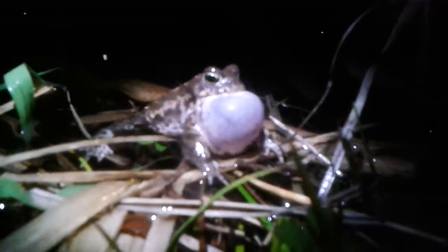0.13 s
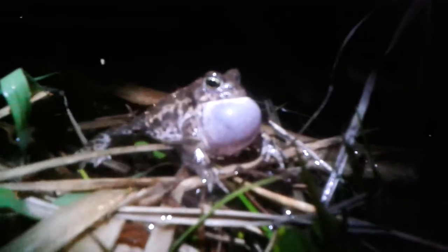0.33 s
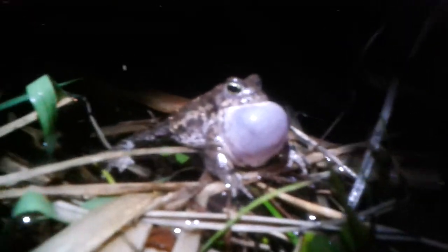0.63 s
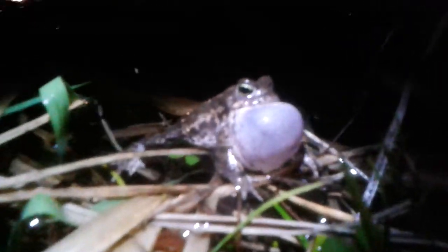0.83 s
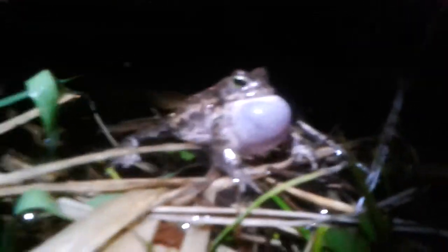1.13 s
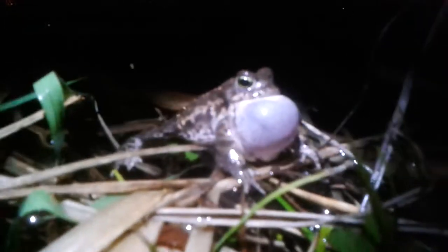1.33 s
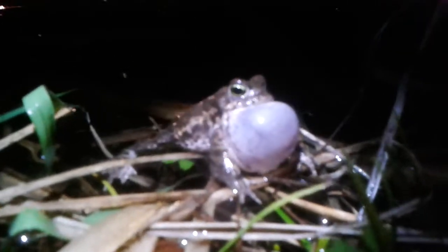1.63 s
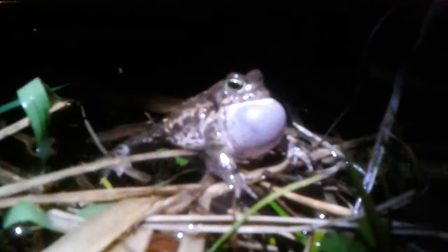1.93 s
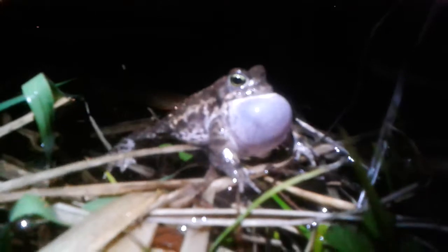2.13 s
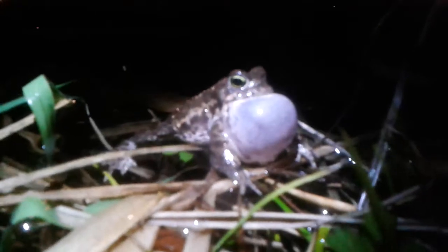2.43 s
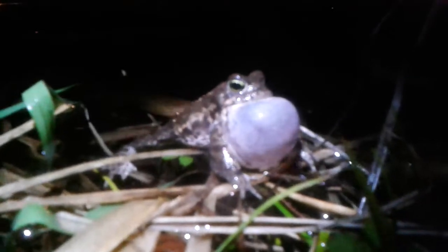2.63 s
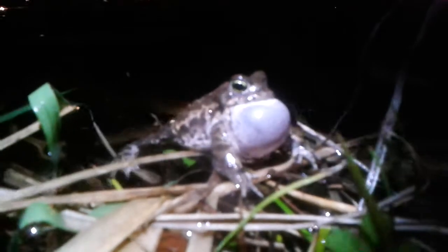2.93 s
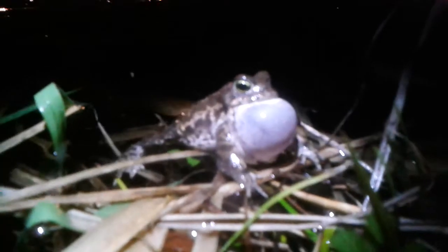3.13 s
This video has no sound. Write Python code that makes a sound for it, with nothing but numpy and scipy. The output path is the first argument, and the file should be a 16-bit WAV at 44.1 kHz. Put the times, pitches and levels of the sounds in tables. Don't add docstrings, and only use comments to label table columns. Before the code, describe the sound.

A toad very close by gives loud, harsh rattling trills over a throbbing distant toad chorus.

```python
import sys
import numpy as np
from scipy import signal
from scipy.io import wavfile
from scipy.ndimage import uniform_filter1d

SR = 44100
rng = np.random.default_rng(int(sys.argv[2]) if len(sys.argv) > 2 else 0)


def master_out(mix):
    frames = np.transpose(np.atleast_2d(mix))
    ceiling = np.clip(frames, -1, 1)
    pcm = np.round(ceiling * 32767).astype(np.int16)
    wavfile.write(sys.argv[1], SR, pcm)


def how_loud(loudness_db):
    steps = np.asarray(loudness_db, float) / 20
    return 10 ** steps


N = 144648


def rings(start_s, level_db, pitch_hz, attack_s, decay_db_per_s, dip_hz=0., octave_db=-57.0):
    chirp_hz, chirp_s, dip_s = 520, 0.0006, 0.004

    def column(value):
        return np.broadcast_to(value, np.shape(start_s))[:, None]

    first = (np.asarray(start_s) * SR).astype(int)
    offsets = np.arange(int(.04 * SR))
    since = np.maximum(offsets / SR - (column(start_s) - first[:, None] / SR), 0)
    cycles = column(pitch_hz) * since
    cycles = cycles - column(dip_hz) * dip_s * (1 - np.exp(-since / dip_s))
    cycles = cycles + chirp_hz * chirp_s * (1 - np.exp(-since / chirp_s))
    phase = 2 * np.pi * cycles
    swell = (1 - np.exp(-since / attack_s)) ** 4
    envelope = how_loud(column(level_db) - column(decay_db_per_s) * since) * swell
    pulses = envelope * (np.sin(phase) + how_loud(octave_db) * np.sin(2 * phase + 1))
    out = np.zeros(N + len(offsets) + SR)
    np.add.at(out, first[:, None] + offsets, pulses)
    return out[:N]


def reeds(x):
    t60_s, gap_s = 0.05, 0.002
    t = np.arange(int(.12 * SR)) / SR
    tail = rng.standard_normal(len(t)) * how_loud(-60 * t / t60_s) * (t > gap_s)
    return signal.fftconvolve(x, tail / np.sqrt(np.sum(tail ** 2)))[:N]


def band(x, lo_hz, hi_hz):
    return signal.sosfilt(signal.butter(2, [lo_hz, hi_hz], "band", fs=SR, output="sos"), x)


def hiss(lo_hz, hi_hz):
    steep = signal.butter(8, [lo_hz, hi_hz], "band", fs=SR, output="sos")
    x = signal.sosfilt(steep, rng.standard_normal(N))
    return x / np.std(x)


def patch(start_s, end_s, level_db):
    t = np.arange(N) / SR
    return how_loud(level_db) * np.clip(np.minimum(t - start_s, end_s - t) / .006, 0, 1)


# [start_s, level_db]
FIRST_TRILL = [(0.22, 14.5), (0.2481, 15), (0.2719, 13.5), (0.2942, 11.5), (0.318, 11), (0.3463, 10),
               (0.3837, 13), (0.4044, 11), (0.4256, 9.5), (0.449, 10), (0.4784, 11.5), (0.5028, 12.5),
               (0.5263, 12), (0.5492, 14), (0.5748, 14.5), (0.6018, 15.5), (0.6298, 14.5), (0.6496, 15.5),
               (0.67, 16), (0.6947, 15), (0.7257, 18), (0.744, 18), (0.7627, 13), (0.7836, 15),
               (0.8133, 15.5)]
SECOND_TRILL = [(1.054, 18), (1.0793, 15.7), (1.1008, 13.9), (1.1243, 13.8), (1.1544, 11.5), (1.1936, 16),
                (1.2137, 17), (1.2332, 16), (1.256, 14.1), (1.282, 12.6), (1.309, 14.4), (1.3307, 12),
                (1.353, 12), (1.382, 10.2), (1.423, 13), (1.45, 16.5), (1.4698, 13.5), (1.4912, 13.2),
                (1.5195, 15.4), (1.5384, 16.3), (1.5563, 12.5), (1.576, 14.9), (1.5989, 15.3),
                (1.617, 12.5)]
THIRD_TRILL = [(1.856, 13.8), (1.886, 17.7), (1.9125, 16), (1.9437, 15), (1.9732, 16.1), (2.0019, 12.8),
               (2.0272, 12.8), (2.057, 11.4), (2.083, 14), (2.113, 14), (2.1453, 12.5), (2.18, 14.9),
               (2.2078, 14.3), (2.2326, 14), (2.2597, 16.2), (2.2879, 17.1), (2.3172, 17.2), (2.339, 16.2),
               (2.3606, 15.8), (2.3902, 16.8), (2.4171, 18.2), (2.4381, 16.6), (2.4628, 15.6),
               (2.4968, 18.9), (2.5185, 19), (2.5405, 16.8), (2.5698, 19), (2.5859, 14.3)]
FOURTH_TRILL = [(2.843, 15.2), (2.873, 16), (2.9027, 14), (2.939, 13.2), (2.9632, 13.7), (2.9862, 12),
                (3.0134, 11.3), (3.0501, 11.7), (3.0742, 14.6), (3.0984, 15.2), (3.1222, 13.7),
                (3.1526, 14.1), (3.1948, 16.7), (3.218, 17.8), (3.2405, 17.7), (3.2649, 17.3)]
# [start_s, level_db, pitch_hz, decay_db_per_s]
SAC_GROANS = [
    (1.6216, 5.5, 1475, 3000),
    (1.626, 3, 1465, 1500),
    (1.631, -1.5, 1390, 2200),
    (2.591, 4.5, 1442, 2197),
    (2.5953, 4, 1440, 2501),
    (2.5987, -9, 1604, 1499),
]


def near_toad():
    attack_s, octave_db = 0.00094, -37.5
    out = 0
    for trill in (FIRST_TRILL, SECOND_TRILL, THIRD_TRILL, FOURTH_TRILL):
        start_s, level_db = np.array(trill).T
        start_s = start_s - .0006
        into_s = start_s - start_s[0]
        dip_hz = 111 * np.exp(-1.64 * into_s)
        pitch_hz = 1528.2 + 47 * into_s + 4 * rng.standard_normal(len(start_s))
        decay_db_per_s = 2489 * (1 + 2.31 * into_s ** 2)
        out = out + rings(start_s, level_db, pitch_hz, attack_s, decay_db_per_s, dip_hz, octave_db)
        after_db = level_db - 17.5 - 22.5 * into_s
        out = out + rings(start_s, after_db, pitch_hz, attack_s, 1497, dip_hz, octave_db)
        out = out + rings(start_s, level_db - 29.5, 3583, 0.00042, 4800)
    start_s, level_db, pitch_hz, decay_db_per_s = np.array(SAC_GROANS).T
    return out + rings(start_s, level_db, pitch_hz, attack_s, decay_db_per_s, octave_db=-28)


# [start_s, peak_db, pitch_hz]
NEIGHBOURS_EARLY = [(0.023, -9.5, 1500), (0.0427, -3, 1600), (0.0595, -5, 1560), (0.0803, -5, 1560),
                    (0.0863, -5, 1630), (0.098, -9.5, 1664), (0.1081, -7.5, 1540), (0.1133, -5.5, 1656),
                    (0.1298, -3.5, 1660), (0.1458, -6, 1640), (0.1528, -5, 1570), (0.158, -13, 1780),
                    (0.1646, -1, 1620), (0.1742, -6.5, 1545), (0.1894, -4, 1660), (0.214, -5, 1560),
                    (0.2364, -5, 1630), (0.284, -3.5, 1620), (0.6436, -9, 1640), (0.6593, -10, 1560),
                    (0.771, -11, 1520), (0.7887, -9, 1630), (0.8102, -10, 1630), (0.8299, -10, 1660),
                    (0.8566, -6, 1630), (0.864, -8.5, 1636), (0.8729, -6, 1647), (0.8945, -1, 1670),
                    (0.9108, -7, 1600), (0.9233, -2.5, 1646), (0.9334, -4.5, 1606), (0.9518, -6, 1600),
                    (0.9661, -6, 1656), (0.975, -6, 1620), (0.9835, -10, 1690), (1.0014, -13, 1730),
                    (1.018, -11, 1720), (1.0413, -9, 1640), (1.1767, -11, 1650), (1.2285, -4, 1620),
                    (1.3007, -4.5, 1590), (1.398, -11, 1636), (1.4172, -6, 1620), (1.4363, -13, 1610),
                    (1.4408, -9, 1630), (1.4996, -9, 1660), (1.5059, -15, 1610), (1.7448, -4, 1590),
                    (1.758, -1, 1635), (1.773, -5, 1620), (1.7796, -3, 1536)]
NEIGHBOURS_LATE = [(1.789, -2.5, 1626), (1.7961, -4, 1540), (1.8034, -8, 1525), (1.8093, -4.5, 1624),
                   (1.8145, -5, 1534), (1.8227, -11, 1570), (1.833, -8, 1655), (1.8419, 0, 1580),
                   (1.8514, -7, 1590), (1.874, 0, 1650), (1.908, -7, 1580), (1.9373, -4, 1690),
                   (1.9653, -3, 1680), (1.9944, -8, 1660), (2.054, -12, 1620), (2.1357, -19, 1630),
                   (2.2787, -11, 1540), (2.3853, -6.5, 1640), (2.4035, -12, 1600), (2.4527, -14, 1650),
                   (2.4946, -5, 1630), (2.5122, -14, 1650), (2.5651, -7, 1590), (2.62, -6, 1670),
                   (2.6348, -7, 1550), (2.6403, -5.5, 1675), (2.6478, -10.5, 1570), (2.6572, -4.5, 1570),
                   (2.663, -5, 1670), (2.6755, -6, 1610), (2.691, -10.5, 1640), (2.6972, -9, 1567),
                   (2.7022, -8.5, 1594), (2.7201, -12, 1620), (2.7254, -11.5, 1530), (2.737, -14, 1590),
                   (2.7495, -11.5, 1600), (2.7554, -8, 1630), (2.7735, -4.5, 1595), (2.7931, -4, 1630),
                   (2.8008, -9.5, 1555), (2.8196, -7, 1630), (2.8324, -4.5, 1610), (2.865, -5, 1580),
                   (2.8888, -5.5, 1617), (2.9225, -3.5, 1600), (2.9786, -10, 1630), (2.9953, -9, 1605),
                   (3.062, -7, 1610), (3.1328, -2, 1620), (3.172, -7, 1740), (3.1925, -7, 1645)]


def neighbours():
    start_s, level_db, pitch_hz = np.array(NEIGHBOURS_EARLY + NEIGHBOURS_LATE).T
    damping_luck, upper_luck = rng.standard_normal((len(start_s), 2)).T
    start_s = np.maximum(start_s - .002, 0)
    level_db = level_db + 13
    decay_db_per_s = 4498 * how_loud(1.37 * damping_luck)
    dry = rings(start_s, level_db, pitch_hz - 20, 0.00088, decay_db_per_s, -21.0, -69.0)
    upper_hz = 3162 * pitch_hz / 1620
    dry = dry + rings(start_s, level_db - 35 + 4 * upper_luck, upper_hz, 0.00062, 2800)
    return dry + how_loud(-12.5) * reeds(dry)


# [time_s, level_db]
CHORUS_THROB = [(0, -22), (.36, -19), (.42, -30), (.57, -30), (.62, -18), (1.03, -22), (1.07, -30),
                (1.17, -19), (1.6, -20), (1.65, -29), (1.74, -29), (1.9, -19), (2.28, -21), (2.33, -29),
                (2.4, -19), (2.88, -21), (2.93, -28), (3.28, -20)]


def chorus():
    pulses_per_s, centre_hz, spread_hz = 110, 1620, 50
    gap_luck, level_luck, pitch_luck = rng.standard_normal((500, 3)).T
    start_s = np.cumsum(how_loud(1.9 * gap_luck) / pulses_per_s)
    keep = start_s < N / SR
    level_db = np.interp(start_s, *np.array(CHORUS_THROB).T) + 3 * level_luck + 10
    pitch_hz = centre_hz + spread_hz * pitch_luck
    dry = rings(start_s[keep], level_db[keep], pitch_hz[keep], .0012, 2200, octave_db=-30.)
    return dry + how_loud(-6) * reeds(dry)


# [start_s, length_s, level_db]
LOW_HOOTS = [
    (.89, .16, -46),
    (1.63, .27, -45),
    (1.9, 1.4, -51),
]


def hoots():
    pitch_hz, fade_s = 647, 0.0084
    t = np.arange(N) / SR
    envelope = 0
    for start_s, length_s, level_db in LOW_HOOTS:
        to_edge_s = np.minimum(t - start_s, start_s + length_s - t)
        envelope = envelope + how_loud(level_db) * np.clip(to_edge_s / fade_s, 0, 1)
    return np.sqrt(2) * envelope * np.sin(2 * np.pi * pitch_hz * t)


# [start_s, level_db]
STEM_TICKS = [
    (.009, -24.5),
    (0.07, -14.5),
    (0.1002, -17),
    (.157, -18.5),
    (.957, -29.5),
    (1.044, -22),
    (2.715, -28.5),
    (2.775, -27),
]
# [start_s, end_s, level_db, top_hz]
HISS_PATCHES = [
    (0, 0.02, -44, 12000),
    (0.056, 0.117, -45.5, 11000),
    (0.114, .182, -47, 9000),
    (0.932, 0.982, -56, 6800),
    (1.027, 1.056, -42, 15000),
    (1.662, 1.74, -53, 14000),
    (1.746, 1.839, -53.5, 8800),
    (2.701, 2.746, -51, 9500),
    (2.752, 2.807, -49.5, 8000),
]


def stems():
    t = np.arange(N) / SR
    envelope = 0
    for start_s, level_db in STEM_TICKS:
        envelope = envelope + how_loud(level_db - 3900 * (t - start_s).clip(0)) * (t >= start_s)
    out = band(band(envelope * rng.standard_normal(N), 1900, 7100), 2000, 10000)
    for start_s, end_s, level_db, top_hz in HISS_PATCHES:
        out = out + patch(start_s, end_s, level_db) * hiss(3200, top_hz)
    return out


# [pitch_hz, level_db per band]
AIR_TONE = [
    (30, -8.5),
    (160, 3.5),
    (300, 1),
    (500, 8),
    (800, 8.5),
    (1300, 8.5),
    (2500, -4.5),
    (4000, -10),
]


def air():
    hz, db = np.array(AIR_TONE).T
    hold = 3000
    out = 0
    for low_hz in 25 * 2 ** np.arange(0, 7.6, .5):
        steps = np.repeat(rng.standard_normal(N // hold + 1), hold)[:N]
        flicker_db = 0.65 * uniform_filter1d(steps, hold)
        level_db = np.interp(np.log(low_hz), np.log(hz), db) + flicker_db
        out = out + how_loud(level_db) * band(rng.standard_normal(N), low_hz, low_hz * np.sqrt(2))
    out = signal.sosfilt(signal.butter(20, 4200, fs=SR, output="sos"), out)
    return out * how_loud(-41) / np.sqrt(np.mean(out ** 2))


def scene():
    return (near_toad() + neighbours() + chorus() + hoots() + stems() + air())[None]


# [start_s, end_s, level_db]
HASH_STRETCHES = [(0.198, 0.339, -49.5), (0.614, .69, -48.5), (0.728, 0.829, -48), (1.05, 1.138, -51),
                  (1.19, 1.397, -51.5), (1.437, 1.491, -53), (1.518, 1.635, -51), (1.84, 2.011, -47),
                  (2.049, 2.079, -54), (2.338, 2.386, -49), (2.429, 2.475, -51), (2.515, 2.548, -48),
                  (2.845, 2.917, -50), (2.964, 3.035, -52.5), (3.096, 3.177, -53.5), (3.217, 3.3, -50)]
# [low_hz, high_hz, level_db]
HASH_TONE = [
    (2300, 5570, 6),
    (6500, 8400, 2.5),
    (10060, 11400, -1.5),
    (13000, 14300, -4),
]


def treble_hash():
    gain = sum(patch(*stretch) for stretch in HASH_STRETCHES)
    return gain * sum(how_loud(level_db) * hiss(low_hz, high_hz) for low_hz, high_hz, level_db in HASH_TONE)


def roll_off(x):
    return signal.sosfilt(signal.butter(12, 16960, fs=SR, output="sos"), x)


def record(dry):
    overload, top_hz = 0.71, 15900
    x = np.clip(dry, -overload, overload) + treble_hash()
    x = signal.sosfilt(signal.ellip(8, .1, 60, top_hz, fs=SR, output="sos"), x)
    return roll_off(x)


dry = scene()
out = record(dry)
master_out(out)
```